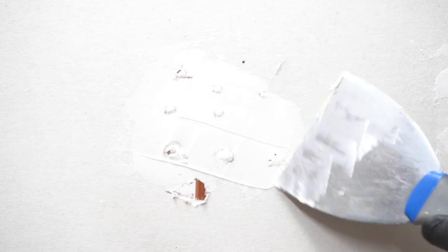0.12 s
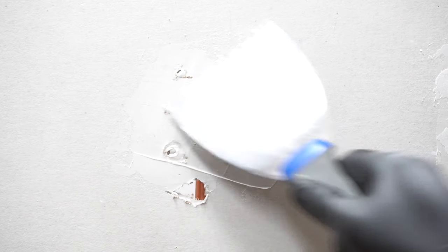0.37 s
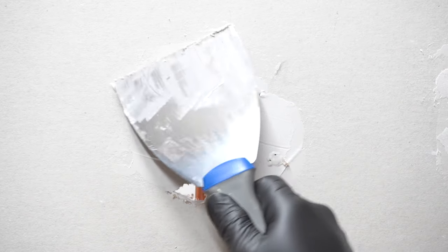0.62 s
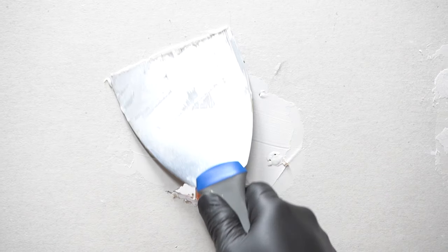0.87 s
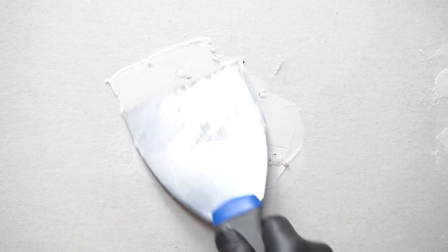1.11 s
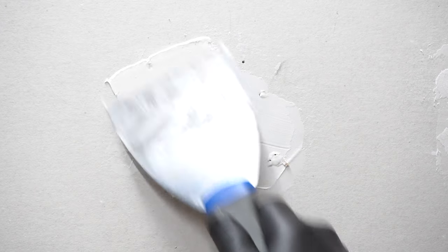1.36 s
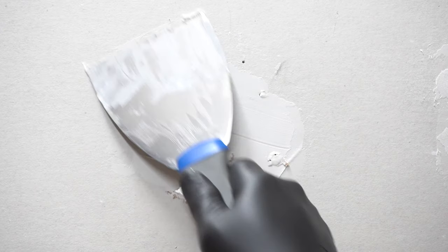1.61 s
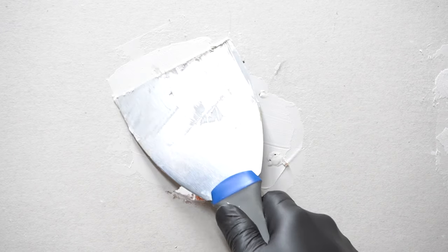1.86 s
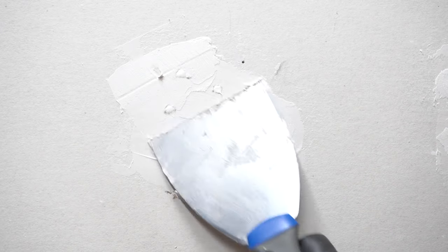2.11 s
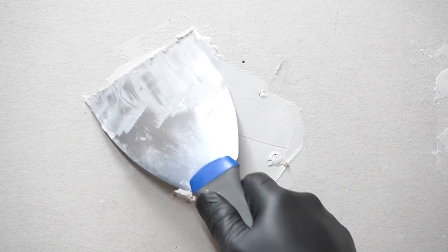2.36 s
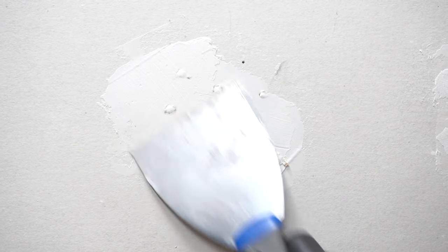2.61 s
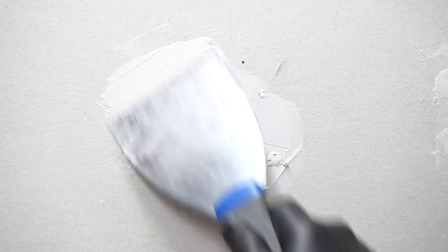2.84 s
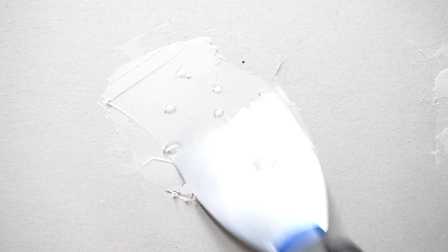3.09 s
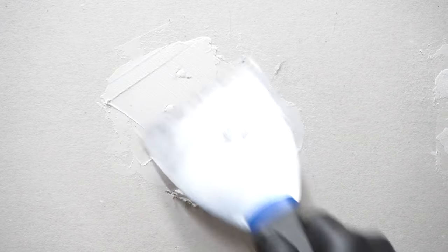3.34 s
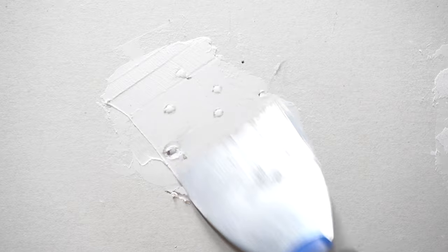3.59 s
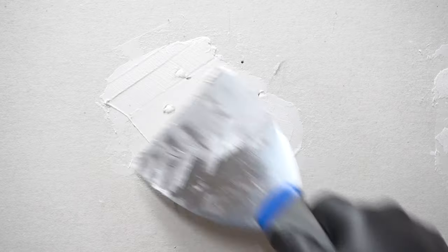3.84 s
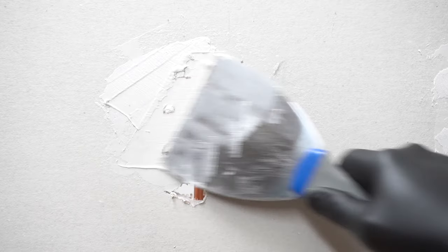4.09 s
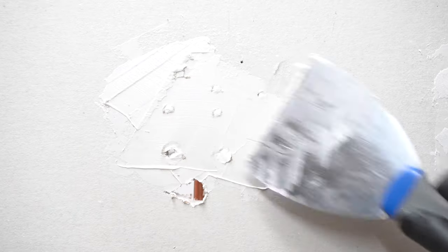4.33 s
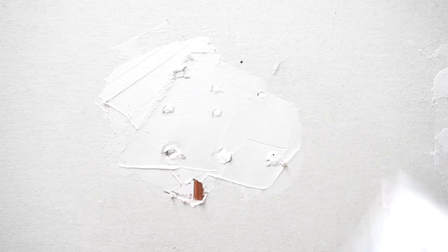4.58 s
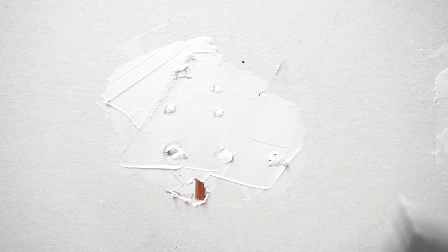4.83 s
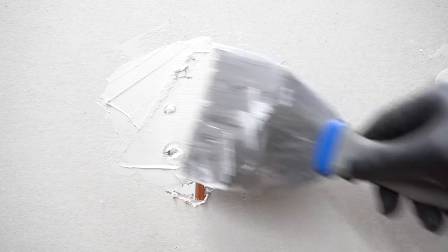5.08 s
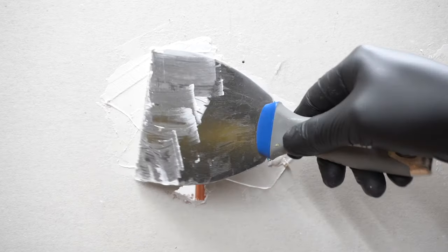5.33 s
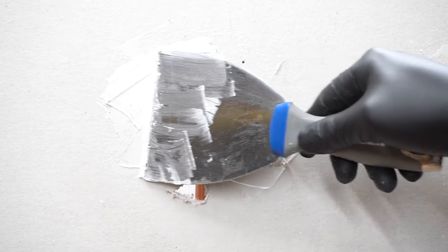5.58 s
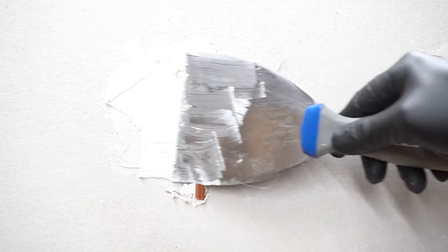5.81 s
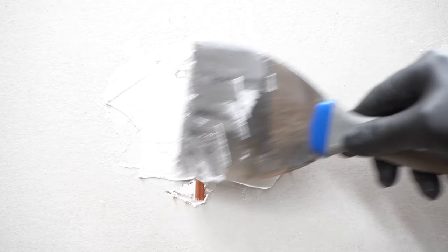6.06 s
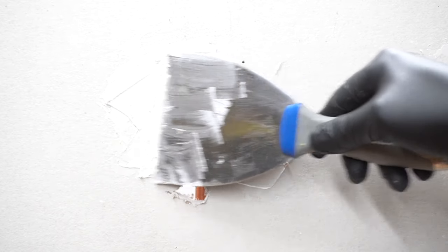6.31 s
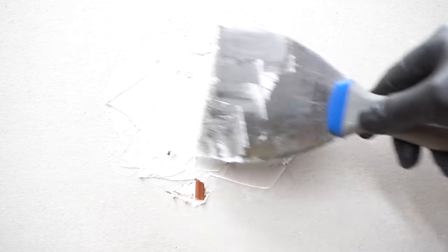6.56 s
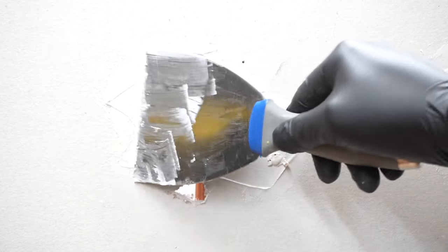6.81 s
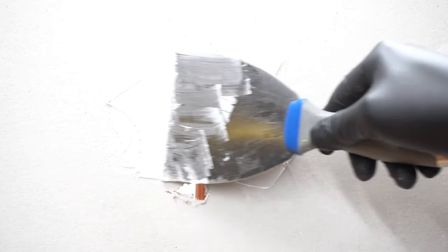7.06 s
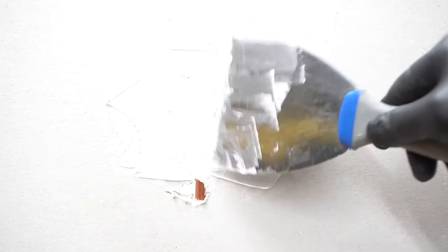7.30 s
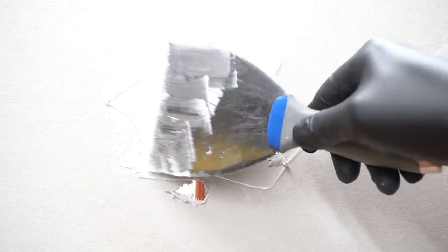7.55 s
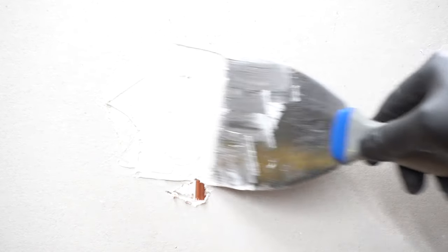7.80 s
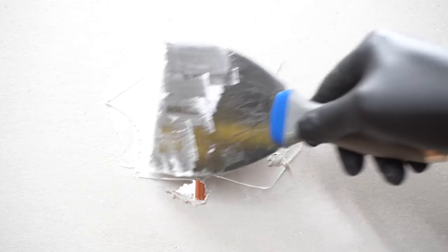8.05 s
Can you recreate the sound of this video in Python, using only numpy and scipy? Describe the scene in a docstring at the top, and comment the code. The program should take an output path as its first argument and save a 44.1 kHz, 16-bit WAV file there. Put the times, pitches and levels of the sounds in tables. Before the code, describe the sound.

A steel filling knife snaps, knocks and briefly scrapes on a hollow plasterboard wall, over a low throbbing building rumble and faint hum.

```python
"""A soft scrape and a faint squeak open the scene: a steel filling knife works soft filler on a hollow wall.
Grains under the edge are random clicks that excite the hiss and rasp of each stroke in a bare room.
Landings knock through decaying modes of the plasterboard; the blade snaps flat in bright bursts of noise.
Sliding tones make the squeaks of glove and blade.
Below lie a rumble with a low throb, a dull murmur, a mains hum and room noise, from shaped noise and sines."""
import sys
import numpy as np
from scipy import signal
from scipy.fft import rfft, irfft
from scipy.io import wavfile

SR = 44100
rng = np.random.default_rng(int(sys.argv[2]) if len(sys.argv) > 2 else 0)


def volts_from_db(level):
    """Convert decibel levels to linear amplitude ratios."""
    exponent = np.asarray(level, float) / 20
    return 10 ** exponent


def to_wav(sig):
    """Store sig (one row per channel, or 1-D mono) as 16-bit WAV at the path in sys.argv[1].

    Samples outside -1..1 are clipped; the rate is SR.
    """
    pcm = np.clip(np.atleast_2d(sig), -1, 1) * 32767
    pcm = np.round(pcm).astype(np.int16)
    wavfile.write(sys.argv[1], SR, pcm.T)  # frames by channels


N = 360297    # length in samples

# strokes and rubs of the blade, timed at their firmest pressure: # top_s, swell_s, fade_s, edge_hiss_db,
# board_rasp_db
BLADE_STROKES = [(0.0, .02, 0.16, -46, -45.5), (0.1, 0.047, 0.085, -42.5, -41.5), (.2, .1, 0.091, -51, -54),
                 (1.28, 0.18, 0.08, -43.5, -43.5), (1.65, 0.0061, 0.017, -40, -35),
                 (1.736, 0.062, 0.073, -29, -26), (1.779, 0.078, 0.053, -28, -25.5),
                 (1.84, .05, 0.13, -50, -38.5), (2.185, 0.28, 0.15, -44.5, -45.5),
                 (2.722, 0.21, 0.12, -32, -39.5), (3.222, .15, 0.13, -34, -37),
                 (3.725, 0.23, 0.14, -34, -36.5), (4.032, 0.023, 0.056, -34.5, -26),
                 (4.149, 0.16, 0.18, -35, -36), (4.285, 0.12, 0.2, -37.5, -44.5),
                 (4.375, 0.069, 0.057, -54, -40), (4.755, 0.25, 0.39, -43, -55), (4.9, 0.072, .2, -54, -46),
                 (5.04, 0.12, 0.35, -45.5, -53), (7.36, 0.043, 0.023, -45, -42.5),
                 (7.935, 0.12, 0.031, -40, -42)]
# blade landing on the board; the upper modes, above 300 Hz, are set against the blow:
# start_s, blow_db, upper_modes_db, cushion_cutoff_hz, contact_s
BLADE_KNOCKS = [(.099, -37.5, -0.5, 1600, 0.00073), (1.651, -33, -1.5, 885, 0.0058),
                (2.4879, -22.5, 2, 2600, 0.0014), (3.037, -28.5, -5, 814, 0.0024),
                (3.559, -20.5, 1.5, 740, 0.0032), (4.016, -21, -6, 1460, 0.0026),
                (6.355, -30.5, -10, 350, 0.008), (6.581, -32.5, 1.5, 870, 0.0025),
                (6.645, -27, -12, 393, 0.0049), (6.9445, -21, -6, 724, 0.0031),
                (7.6991, -17, -3, 1290, 0.005), (7.93, -45.5, 14.5, 1520, 0.0011)]
# blade snapping flat; low and middle bands are set against the top band, the ring against the peak:
# start_s, peak_db, low_band_db, middle_band_db, steel_ring_db
BLADE_TICKS = [(0.402, -35, -6, -1, -31), (0.9085, -9.5, -2.5, 1.5, -22), (1.273, -34.5, -4, 0, -5),
               (1.7345, -11, -14, 0, -28), (1.885, -34, -12, 0, -30), (2.5380, -6.5, -3, 2, -35),
               (3.0781, -12, -7, -0.5, -30), (3.5965, -7.5, -3, -2, -43), (4.091, -13, -4, -1.5, -21.5),
               (4.8623, -26, 2, 2, -31), (5.5779, -9.5, -10, -2, -42), (6.4157, -6.5, -6, -0.5, -38),
               (6.5816, -17, 5.5, 3, -15.5), (7.001, -5.5, -5, -1, -28), (7.1912, -27, -3, -1, -23),
               (7.7005, -24, -12, -4, -30), (7.7636, -7, -11, -3.5, -35.5)]
# ringing modes of the plasterboard, before the chance of each landing: pitch_hz, level_db, t60_s
BOARD_MODES = [(80.7, -5, 0.48), (106.4, 1.5, 0.41), (169.3, 4.5, 0.31), (237.3, 1.5, 0.16),
               (285, 0.5, 0.17), (346, -3.5, 0.23), (403, -0.5, 0.099), (482, 2.5, 0.095),
               (551.5, -0.5, 0.15), (581.5, -26.5, 0.078), (637, -3.5, 0.3), (668, -20, 0.23),
               (731, -4.5, 0.16), (800, -10, .1), (892, -8, .11), (1060, 16, 0.013), (1235, -1.5, 0.061),
               (1420, -9, 0.044), (1580, 11, 0.017), (1690, 1, 0.017), (2040, -17, 0.025), (2170, 1, 0.029),
               (2600, -6, 0.025)]
# ringing modes of the steel blade: pitch_hz, width_hz (of the first of two filters), level_db
BLADE_MODES = [(1410, 190, -9), (2140, 80, -3.5), (3320, 840, -4), (4750, 500, -9)]
# rasp resonances of blade and board under the edge: pitch_hz, width_hz, relative_level_db
RASP_RESONANCES = [(480, 290, 7.5), (790, 306, 6), (1040, 300, 6.5), (1333, 140, 5.5), (1597, 144, 7.5),
                   (2167, 170, 3), (2600, 350, -3), (4400, 330, -8), (7340, 160, -13)]
# colour of the edge hiss: frequency_hz, relative_density_db (per Hz)
EDGE_COLOUR = [(1410, 0), (2400, 3.5), (2730, 0), (5220, -3.5), (7120, 2), (8020, -0.5), (12900, -1),
               (14500, -3.5), (16000, -19)]
# colour of a tick, before its bands are rebalanced: frequency_hz, relative_density_db (per Hz)
SNAP_COLOUR = [(500, -8), (900, 0.5), (1700, -8.5), (3700, 2), (4400, -3), (6000, -9.5), (8000, -5),
               (9800, -4), (12900, 5.5), (14500, -6.5), (16200, -29)]
# thin squeaks, high ones from the glove and low ones from the blade:
# start_s, length_s, start_pitch_hz, end_pitch_hz, level_db
SQUEAK_SLIDES = [(.015, .045, 1390, 1320, -39), (.095, .014, 1200, 1150, -35),
                 (.46, .08, 11000, 10600, -58), (.47, .03, 12100, 11800, -56),
                 (.58, .09, 10800, 10950, -55), (.63, .11, 8900, 9250, -57), (.66, .08, 12200, 11900, -57),
                 (.68, .06, 10950, 10400, -55), (.77, .04, 10900, 10700, -56),
                 (.84, .065, 10150, 10000, -55), (4.86, .12, 11500, 9500, -46),
                 (4.93, .035, 11350, 10900, -47), (4.965, .04, 10600, 9900, -51)]
# course of the rumble: time_s, level_db
RUMBLE_LEVEL = [(0.0, -32), (0.3, -32.5), (1.2, -32.5), (2.3, -31.5), (2.7, -29.5), (3.4, -29),
                (4.1, -24.5), (4.6, -28), (4.95, -24), (5.2, -25.5), (5.6, -26.5), (6.6, -26.5),
                (7.4, -26.5), (8.17, -28)]
# colour of the dull murmur in the board: frequency_hz, relative_density_db (per Hz)
MURMUR_COLOUR = [(100, -33), (170, 2), (204, -7.5), (237, -1.5), (263, -5), (600, -15.5), (780, -38),
                 (1320, -120)]
# colour of the rumble: frequency_hz, relative_density_db (per Hz)
RUMBLE_COLOUR = [(8.8, -28), (15, -7.5), (30, 5), (49, -4), (70, 2.5), (118, -6.5), (140, -6), (170, -15),
                 (220, -58), (370, -120)]
# colour of the room noise: frequency_hz, relative_density_db (per Hz)
ROOM_NOISE_COLOUR = [(350, -31), (600, -0.5), (931, -2.5), (1050, -4.5), (1430, -7), (1530, -8.5),
                     (12300, -18), (14300, -19.5), (16000, -15)]
# partials of the mains hum: pitch_hz, rms_level_db
HUM_PARTIALS = [(120.1, -37), (240.5, -53)]

# strokes: level one swell before or one fade after the top; roundness 1 = pointed, 2 = round
STROKE_EDGE_DB, STROKE_ROUNDNESS = -25.5, 1.08
STROKE_ROOM_DB, STROKE_ROOM_T60_S = -8.0, 0.15
# knocks: push against the blow; the blade still drags on the board and blurs each mode
PUSH_DB, MODE_RISE_S = 15.5, 0.003
BLUR = 0.05    # width as a share of the mode's pitch
KNOCK_ROOM_DB, KNOCK_ROOM_T60_S = -6.5, 0.34
# ticks: tail against the peak, low tail against the tail
BURST_S, ECHO_S, ECHO_DB = 0.0005, 0.0058, -13.5
TICK_TAIL_DB, TICK_TAIL_T60_S = -22.5, 0.2
LOW_TAIL_DB, LOW_TAIL_T60_S, STEEL_T60_S = -3, 0.25, 0.17
# background: murmur and noise at the rumble's middle level, and dB they move per dB of rumble
RUMBLE_MIDDLE_DB = -29
MURMUR_DB, MURMUR_FOLLOWS, NOISE_DB, NOISE_FOLLOWS = -42.5, 0.89, -45, 0.69
# throb: level against the rumble, one width for each of its two filters
THROB_HZ, THROB_WIDTHS_HZ, THROB_DB = 24.9, (12.4, 13.8), -0.5
TOP_CUT_HZ = 14800


def rms_one(x):
    """Scale to unit rms."""
    return x / np.sqrt(np.mean(x ** 2) + 1e-20)


def colour(x, spectrum):
    """Shape a signal by a dB-per-Hz table, drawn straight over log frequency; unit rms."""
    hz = np.fft.rfftfreq(len(x), 1 / SR) + 1
    table_hz, table_db = np.transpose(spectrum)
    gain = volts_from_db(np.interp(np.log(hz), np.log(table_hz), table_db))
    return rms_one(irfft(rfft(x) * gain, len(x)))


def drift(rate_hz):
    """Slow random wander of spread one: low-passed noise drawn every 40 samples."""
    r = np.exp(-80 * np.pi * rate_hz / SR)
    noise = rng.standard_normal(N // 40 + 2002)
    slow = signal.lfilter([1], [1, -2 * r, r * r], noise)[2000:]    # skip the filter's start
    return np.interp(np.arange(N) / 40, np.arange(len(slow)), rms_one(slow))


def resonance(x, hz, width_hz):
    """Two-pole band-pass with gain one on top."""
    r = np.exp(-np.pi * width_hz / SR)
    feed = np.array([1, 0, -1]) * (1 - r * r) / 2
    return signal.lfilter(feed, [1, -2 * r * np.cos(2 * np.pi * hz / SR), r * r], x)


def band(x, order, edges_hz, kind):
    """Butterworth filter that passes one band."""
    return signal.sosfilt(signal.butter(order, edges_hz, kind, fs=SR, output="sos"), x)


def room(x, room_db, t60_s):
    """Direct sound plus a diffuse tail of dying noise that starts after the first wall."""
    t = np.arange(SR // 2) / SR
    tail = rng.standard_normal(len(t)) * volts_from_db(-60 * t / t60_s) * (t > .003)
    return x + volts_from_db(room_db) * signal.fftconvolve(x, tail / np.linalg.norm(tail))[:N]


def grit(per_s, spread_db):
    """Filler grains catching the edge: random clicks of uneven size."""
    sizes = volts_from_db(spread_db * np.minimum(rng.exponential(1, N), 5)) * rng.choice([-1, 1], N)
    return rms_one(sizes * (rng.random(N) < per_s / SR))


def strokes():
    """Grains under the moving edge hiss in the blade and ring the lower resonances."""
    t, hiss_gain, rasp_gain = np.arange(N) / SR, 0, 0
    for top_s, swell_s, fade_s, hiss_db, rasp_db in BLADE_STROKES:
        distance = (np.abs(t - top_s) / np.where(t < top_s, swell_s, fade_s)).clip(0, 9)
        pressure = volts_from_db(STROKE_EDGE_DB * distance ** STROKE_ROUNDNESS)
        hiss_gain = hiss_gain + volts_from_db(hiss_db) * pressure
        rasp_gain = rasp_gain + volts_from_db(rasp_db) * pressure
    hiss = colour(grit(per_s=12000, spread_db=3.5), EDGE_COLOUR)
    hiss *= volts_from_db(1.0 * drift(73))    # the surface is not even
    grains = grit(per_s=6000, spread_db=3.5)
    rasp = np.zeros(N)
    for k, (hz, width_hz, db) in enumerate(RASP_RESONANCES):
        rasp += (-1) ** k * volts_from_db(db) * resonance(grains, hz, width_hz)    # neighbours in opposite polarity
    rasp = rms_one(rasp) * volts_from_db(0.5 * drift(53))
    return room(hiss_gain * hiss + rasp_gain * rasp, STROKE_ROOM_DB, STROKE_ROOM_T60_S)


def knocks():
    """Each landing pushes the board in and back, then its modes ring; soft filler cushions the top away."""
    out, t = np.zeros(N), np.arange(SR // 2) / SR
    hz, mode_db, t60_s = np.array(BOARD_MODES).T[:, :, None]
    modes = len(BOARD_MODES)
    luck = rng.standard_normal((len(BLADE_KNOCKS), 3, modes, 1))
    for knock, (strength, detune, phase) in zip(BLADE_KNOCKS, luck):
        start_s, blow_db, upper_db, cushion_hz, contact_s = knock
        wander = np.cumsum(rng.standard_normal((modes, len(t))), axis=1)
        blur = np.sqrt(2 * np.pi * BLUR * hz / SR) * wander
        level_db = blow_db + mode_db + upper_db * (hz > 300) + 2.0 * strength
        mode_hz = hz * (1 + 0.021 * detune)    # the pressing blade shifts each mode a little
        turn = 2 * np.pi * mode_hz * t + 0.98 * phase + blur
        ringing = np.sum(volts_from_db(level_db - 60 * t / t60_s) * np.sin(turn), axis=0)
        ringing *= 1 - np.exp(-t / MODE_RISE_S)
        u = t / contact_s
        push = volts_from_db(blow_db + PUSH_DB) * np.sin(2 * np.pi * u) * (1 - u) * (u < 1)
        start = round(start_s * SR)
        cushioned = band(-ringing - push, 2, cushion_hz, "low")
        out[start:start + len(t)] += cushioned[:N - start]
    return room(out, KNOCK_ROOM_DB, KNOCK_ROOM_T60_S)


def burst(t):
    """Sharp rise and fall with its top, of one, at BURST_S."""
    u = t.clip(0) / BURST_S
    return u * np.exp(1 - u)


def ticks():
    """A millisecond burst of bright noise, one near echo and a diffuse tail; the steel rings roughly."""
    noise = colour(rng.standard_normal(N), SNAP_COLOUR)
    low = rms_one(band(noise, 2, 3800, "low"))
    middle = rms_one(band(noise, 2, [3800, 9000], "band"))
    top = rms_one(band(noise, 3, 9000, "high"))
    white = rng.standard_normal(N)
    steel = np.array([volts_from_db(db) * rms_one(resonance(resonance(white, hz, width_hz), hz, 2 * width_hz))
                      for hz, width_hz, db in BLADE_MODES])
    grip = volts_from_db(2.5 * rng.standard_normal((len(BLADE_TICKS), len(BLADE_MODES))))
    out, t = np.zeros(N), np.arange(SR // 4) / SR
    snap = burst(t) + volts_from_db(ECHO_DB) * burst(t - ECHO_S)
    for (start_s, peak_db, low_db, middle_db, ring_db), free in zip(BLADE_TICKS, grip):
        start = round(start_s * SR)
        span = slice(start, start + len(t))
        bright = top[span] + volts_from_db(middle_db) * middle[span]
        crack = snap * (bright + volts_from_db(low_db) * low[span])
        tail = volts_from_db(TICK_TAIL_DB - 60 * t / TICK_TAIL_T60_S) * bright
        # lower tones die later
        tail += volts_from_db(TICK_TAIL_DB + LOW_TAIL_DB - 60 * t / LOW_TAIL_T60_S) * low[span]
        # each hold frees other modes
        ringing = volts_from_db(ring_db - 60 * t / STEEL_T60_S) * (free @ steel[:, span])
        out[span] += volts_from_db(peak_db) * (crack / np.abs(crack).max() + tail + ringing)
    return out


def squeaks():
    """Glove and blade whistle thinly: sines that slide and waver in pitch and flicker in level."""
    out, waver, flicker = np.zeros(N), drift(60), volts_from_db(3.0 * drift(50))
    for start_s, length_s, start_hz, end_hz, db in SQUEAK_SLIDES:
        span = slice(round(start_s * SR), round((start_s + length_s) * SR))
        u = np.linspace(0, 1, span.stop - span.start)
        hz = start_hz + (end_hz - start_hz) * u + 40 * waver[span]
        swell = np.sqrt(np.sin(np.pi * u).clip(0))
        whistle = np.sin(2 * np.pi * np.cumsum(hz) / SR)
        out[span] += volts_from_db(db) * flicker[span] * swell * whistle
    return out


def rumble(level_db):
    """Building rumble: low noise that wanders in level, with a throb from a narrow band of noise."""
    body = colour(rng.standard_normal(N), RUMBLE_COLOUR) * volts_from_db(2.5 * drift(3))
    throb = rng.standard_normal(N)
    for width_hz in THROB_WIDTHS_HZ:
        throb = resonance(throb, THROB_HZ, width_hz)
    return volts_from_db(level_db) * (body + volts_from_db(THROB_DB) * rms_one(throb))


def murmur(swing_db):
    """Dull murmur in the board: wandering low noise that follows the rumble."""
    noise = colour(rng.standard_normal(N), MURMUR_COLOUR) * volts_from_db(2.0 * drift(6.0))
    return volts_from_db(MURMUR_DB + MURMUR_FOLLOWS * swing_db) * noise


def mains_hum():
    """Sine partials that waver slightly in level and phase."""
    t, out = np.arange(N) / SR, np.zeros(N)
    for hz, db in HUM_PARTIALS:
        level = np.sqrt(2) * volts_from_db(db + 1.0 * drift(7.6))
        out += level * np.sin(2 * np.pi * hz * t + 0.2 * drift(2.5))
    return out


def room_noise(swing_db):
    """Broad hiss of the room: shaped noise that partly follows the rumble."""
    noise = colour(rng.standard_normal(N), ROOM_NOISE_COLOUR)
    return volts_from_db(NOISE_DB + NOISE_FOLLOWS * swing_db) * noise


def background():
    """Rumble, murmur and room noise rise and fall together over a hum."""
    rumble_db = np.interp(np.arange(N) / SR, *np.transpose(RUMBLE_LEVEL))
    swing_db = rumble_db - RUMBLE_MIDDLE_DB
    return rumble(rumble_db) + murmur(swing_db) + mains_hum() + room_noise(swing_db)


def scene():
    """Wall sounds over the background, as one channel."""
    return (strokes() + knocks() + ticks() + squeaks() + background())[None]


def band_limit(x):
    """A steep low-pass at the top of the band."""
    return signal.sosfilt(signal.butter(12, 16530, fs=SR, output="sos"), x)


def record(dry):
    """A steep low-pass takes off the extreme top."""
    mix = band(dry, 8, TOP_CUT_HZ, "low")
    return band_limit(mix)


dry = scene()
out = record(dry)
to_wav(out)
```